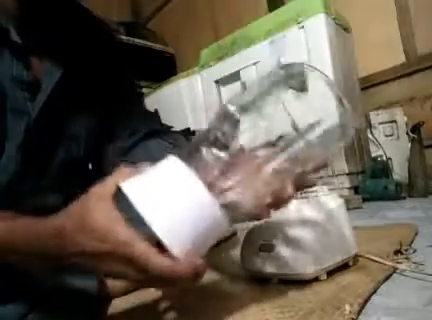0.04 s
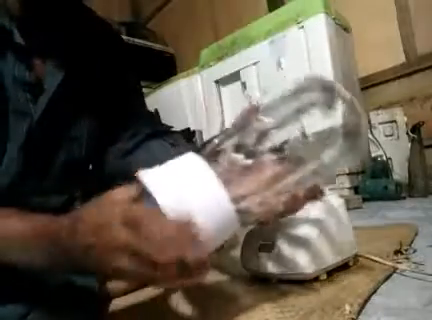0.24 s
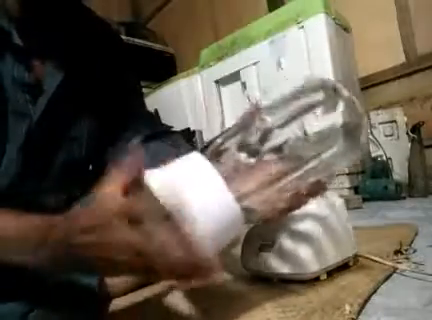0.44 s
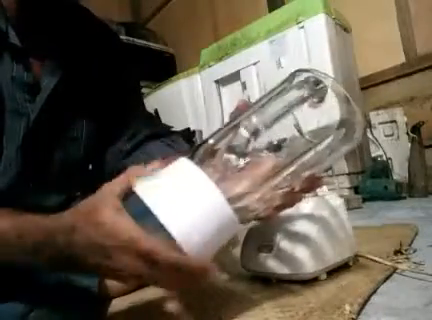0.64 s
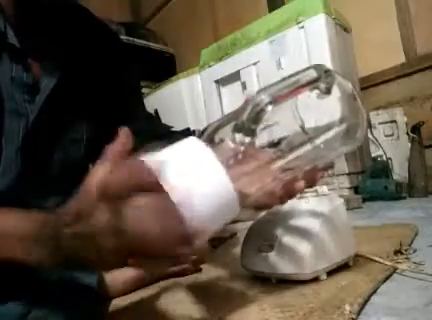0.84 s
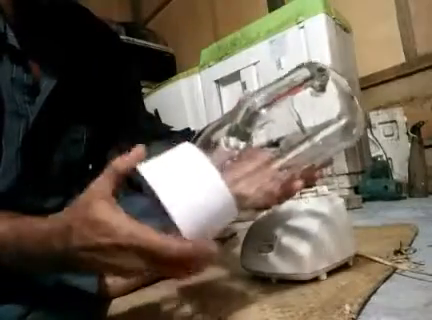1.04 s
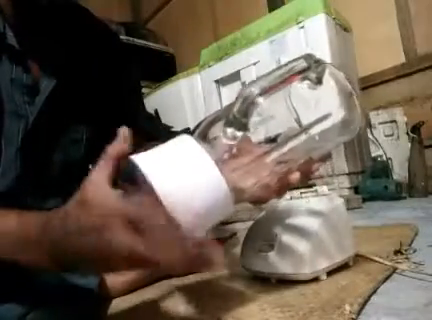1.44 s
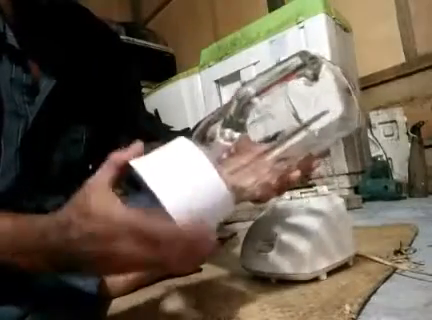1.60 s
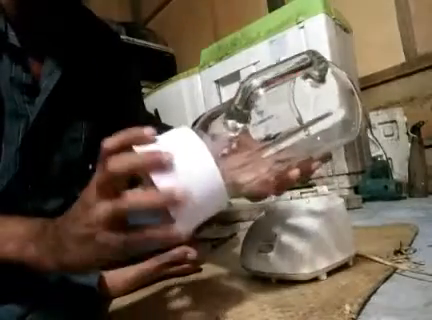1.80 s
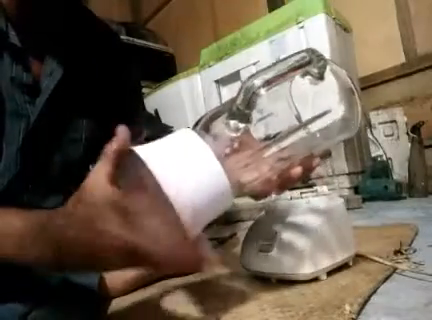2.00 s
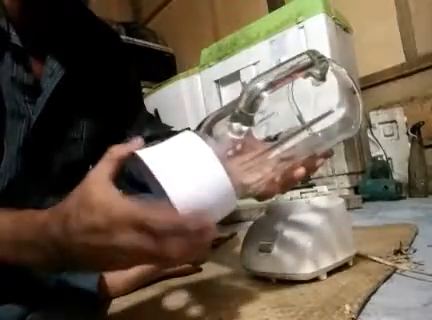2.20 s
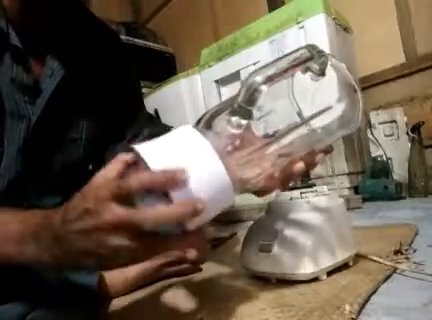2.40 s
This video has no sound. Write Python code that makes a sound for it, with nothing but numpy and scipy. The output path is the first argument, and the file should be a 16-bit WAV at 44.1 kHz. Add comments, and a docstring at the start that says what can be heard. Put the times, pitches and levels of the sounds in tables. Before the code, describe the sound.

Plastic base screwed onto an empty blender jar, with hollow knocks, sharp clicks and scrapes.

```python
"""Screwing the base onto a blender jar.

One hand holds the empty jar close to the microphone; the other twists its plastic base on in short
turns. Each new grip knocks the hollow jar, and the threads catch and snap with bright clicks. In
between, plastic and palm scrape and fingertips squeak. A small cluttered room echoes briefly."""
import sys
import numpy as np
from scipy import signal
from scipy.fft import rfft, irfft
from scipy.io import wavfile

SR = 44100
rng = np.random.default_rng(int(sys.argv[2]) if len(sys.argv) > 2 else 0)


def digitize_waveform(pressure):
    """Quantize a signal to 16-bit integers and store it at the path in sys.argv[1].

    Rows of a 2-D input are taken as channels; values are limited to [-1, 1].
    """
    field = np.atleast_2d(pressure).T
    bounded = np.clip(field, -1, 1)
    quanta = np.round(bounded * 32767).astype(np.int16)
    wavfile.write(sys.argv[1], SR, quanta)


N = 112454
SOFT_RISE_S, HARD_RISE_S = 0.0011, 0.00061  # how fast a bump and a click build up


def gain(db):
    """Turn decibels into a number to multiply by."""
    return 10 ** (np.asarray(db) / 20)


def fade(t, t60):
    """Die away by 60 dB in t60 seconds, the 'fade time'."""
    return np.exp(-np.log(1000) * t / t60)


def rise(t, seconds):
    """Climb smoothly from 0 towards 1."""
    return 1 - np.exp(-t / seconds)


def unit_energy(x):
    """Give a short sound the energy of level 1 held for 5 ms."""
    return x * np.sqrt(.005 * SR / np.sum(x ** 2))


def unit_level(x):
    """Scale a noise to an average (rms) level of 1."""
    return x / np.std(x)


def add(out, at, x):
    """Mix x into out at a time in seconds."""
    i = max(int(at * SR), 0)
    out[i:i + len(x)] += x[:max(len(out) - i, 0)]


def lowpass(x, hz, order=2):
    """Dull the sound above hz."""
    return signal.sosfilt(signal.butter(order, min(hz, SR / 2 - 1000), fs=SR, output="sos"), x)


def wobble(t, hz):
    """A random wavering, mostly slower than hz."""
    return unit_level(lowpass(rng.standard_normal(len(t)), hz))


def colour(x, points):
    """Shape the tone of x along a curve of (frequency [Hz], level [dB]) points."""
    hz, db = np.array(points, float).T
    size = 2048
    grid = np.maximum(np.arange(size // 2 + 1) * SR / size, 1)
    curve = gain(np.interp(np.log(grid), np.log(hz), db))
    # build the filter so that nothing sounds before the hit (minimum phase)
    cepstrum = irfft(np.log(curve))
    cepstrum[1:size // 2] *= 2
    cepstrum[size // 2 + 1:] = 0
    return signal.fftconvolve(x, irfft(np.exp(rfft(cepstrum))))[:len(x)]


def vary(points):
    """Add random peaks and dips to a tone curve: every contact is at another spot."""
    hz, db = np.array(points, float).T
    grid = np.geomspace(hz[0], hz[-1], num=40)
    curve_db = np.interp(np.log(grid), np.log(hz), db)
    return np.column_stack([grid, curve_db + 3 * rng.standard_normal(len(grid))])


def ring(t, tones, scatter=0):
    """Fading tones; scatter varies their strength and sign, as the place of a hit does."""
    out = 0
    for hz, db, t60 in tones:
        strength = gain(db) * (1 - scatter + scatter * rng.standard_normal())
        out = out + strength * np.sin(2 * np.pi * hz * t) * fade(t, t60)
    return out


def burst(t, tone, t60):
    """Struck plastic: so many short tones that they blur into a puff of noise."""
    noise = rng.standard_normal(len(t)) * fade(t, t60) * rise(t, HARD_RISE_S)
    return unit_energy(colour(noise, tone))


# tone of the background noise (frequency [Hz], relative level [dB])
BACKGROUND_TONE = [(25, -11.5), (55, 7.5), (90, -18), (145, -3), (250, -19), (900, -19.5), (2000, -24.5),
                   (5000, -36.5), (6400, -29), (7200, -23.5), (8200, -34.5), (10500, -30.5), (14000, -33)]

def background():
    """A faint, steady rumble with a little hiss."""
    return gain(-69.5) * unit_level(colour(rng.standard_normal(N), BACKGROUND_TONE))


# bands of the echo (low edge [Hz], high edge [Hz], fade time [s], level against the direct sound [dB])
ECHO_BANDS = [(39.6, 400, 0.11, -9), (410, 1130, 0.21, -9), (685, 2040, 0.51, -16), (3230, 16600, 0.2, -11)]

def room_echo(x):
    """The room throws the sound back after 7 ms as a short blur; each band fades at its own rate."""
    t = np.arange(SR // 2) / SR
    echo = 0
    for low_hz, high_hz, t60, db in ECHO_BANDS:
        tail = rng.standard_normal(len(t)) * fade(t, t60) * (t > .007)
        band = signal.sosfilt(signal.butter(2, [low_hz, high_hz], "band", fs=SR, output="sos"), tail)
        echo = echo + gain(db) * band * np.sqrt(2 * (high_hz - low_hz) / SR / np.sum(band ** 2))
    return signal.fftconvolve(x, echo)[:N]


# fingertip skids (time [s], level [dB], starting pitch [Hz])
FINGER_SKIDS = [(0.975, -42, 1686), (1.117, -53.5, 1970), (1.134, -44.5, 1640), (1.161, -47.5, 1715),
                (1.179, -45.5, 2080), (1.323, -46.5, 1800)]

def finger_squeaks(t):
    """A fingertip skids on the smooth wall: a short rising chirp with a weaker tone above it."""
    out = np.zeros(N)
    swell = t * np.exp(-t / .0026)
    for at, db, hz in FINGER_SKIDS:
        pitch_hz = hz * (1 + 8 * t + .08 * wobble(t, hz=600))
        phase = 2 * np.pi * np.cumsum(pitch_hz) / SR
        chirp = np.sin(phase) + gain(-6.5) * np.sin(1.42 * phase)
        add(out, at, gain(db) * unit_energy(swell * chirp))
    return out


# tones of the gripped base (pitch [Hz], relative level [dB], fade time [s])
BASE_TONES = [(70, -10, 0.097), (164.9, -14.5, 0.039), (298.7, -5, 0.14)]
# the palm lands for a firm grip (time [s], level [dB], thump pitch [Hz])
PALM_LANDINGS = [(0.227, -41, 300), (0.349, -40, 175), (0.521, -39, 315), (0.679, -35, 303),
                 (0.815, -31, 300), (0.911, -31, 300), (1.601, -36, 297), (1.763, -30, 180.6),
                 (2.178, -35.5, 260)]

def palm_thuds(t):
    """The heel of the hand bumps the base; the more flesh lands, the lower the thump."""
    out = np.zeros(N)
    thump_fade_s = .035
    for at, db, hz in PALM_LANDINGS:
        thud = ring(t, [(hz, 0, thump_fade_s)] + BASE_TONES) * rise(t, SOFT_RISE_S)
        add(out, at, gain(db) * unit_energy(thud))
    return out


# tones of the air in the jar and of the base (pitch [Hz], relative level [dB], fade time [s])
HOLLOW_TONES = [(170, -26.5, 0.078), (313, -31.5, 0.57), (360, -10, 0.074), (467, 5, 0.094),
                (497.7, 18.5, 0.043), (558, 3.5, 0.034), (643, -15.5, .06)]

def hollow_note(t):
    """The air in the empty jar rings together with the base."""
    return ring(t, HOLLOW_TONES)


# tones of the hiss at the rubbing spot and the rasp in the wall (frequency [Hz], relative level [dB])
HISS_TONE = [(50, -49.5), (500, -16), (2500, 8), (4000, -1), (5200, -6), (7200, -0.5), (9000, 1.5),
             (11000, -4.5), (15000, -16)]
RASP_TONE = [(30, -37), (150, -16), (380, -4.5), (800, -4), (1500, -4), (2500, -4.5), (3500, -19.5),
             (5200, -26), (15000, -45.5)]
# rubbing strokes (time [s], length [s], hiss [dB], rasp [dB], hollow note [dB])
STROKES = [(0.216, 0.05, -45, -43.5, -70), (0.259, 0.021, -42.5, -39, -41), (0.333, 0.052, -50, -51, -42.5),
           (0.37, 0.022, -37, -37, -39.5), (0.47, 0.067, -61, -59, -59), (0.559, 0.037, -40, -40.5, -36.5),
           (0.693, 0.3, -49, -57.5, -53), (0.775, 0.081, -36.5, -33, -37), (.850, 0.14, -85, -48.5, -45),
           (.935, 0.045, -78, -53, -49), (1.174, 0.09, -45, -40, -37.5), (1.261, 0.11, -52.5, -49, -41.5),
           (1.550, 0.17, -74, -59.5, -44.5), (1.695, 0.15, -48.5, -45, -51),
           (1.780, 0.031, -37.5, -36.5, -32.5), (1.913, 0.19, -72, -70.5, -58.5),
           (2.195, 0.15, -53.5, -47.5, -45), (2.314, 0.02, -40, -53, -54), (2.42, 0.032, -57, -49.5, -45),
           (2.534, 0.035, -55, -50, -40.5)]

def scrapes(t):
    """Plastic and palm stick and slip in tiny grains that hiss, rasp and stir the air in the jar."""
    out = np.zeros(N)
    rise_s, fall_s = .014, .019
    grains_per_s, scatter_db, hard_rub_db = 2600, 3.2, -36
    hollow = hollow_note(t)
    for at, length, hiss_db, rasp_db, note_db in STROKES:
        pressure = np.clip(t / rise_s, 0, 1) * np.exp(-np.maximum(t - length + fall_s, 0) / fall_s)
        grit, weight = rng.standard_normal((2, len(t)))
        slips = (rng.random(len(t)) < grains_per_s / SR) * gain(scatter_db * weight)
        slip_energy = signal.fftconvolve(slips ** 2, fade(t, t60=.005) ** 2)[:len(t)]
        grains = grit * pressure * np.sqrt(np.abs(slip_energy))
        crunch_db = 4 * min(gain(rasp_db - hard_rub_db), 1)  # harder rubbing bunches the grains
        hiss = unit_level(colour(grains * gain(crunch_db * wobble(t, hz=110)), vary(HISS_TONE)))
        rasp = unit_level(colour(grains * gain(crunch_db * wobble(t, hz=110)), RASP_TONE))
        note = unit_level(signal.fftconvolve(grains, hollow)[:len(t)])
        stroke = gain(hiss_db) * hiss + gain(rasp_db) * rasp + gain(note_db) * note
        add(out, at, stroke * np.sqrt(np.mean(pressure ** 2)))
    return out


# ringing tones of the wall, and the tone of its clack (frequency [Hz], relative level [dB])
WALL_TONES = [(738, 2), (870, 2.5), (960, 1.5), (1045, 4.5), (1128, 3.5), (1205, 8.5), (1345, 5.5),
              (1570, 8), (2037, -8.5), (2315, -8), (2520, -8)]
CLACK_TONE = [(25, -55.5), (60, -17), (100, -20.5), (150, 0.5), (380, 1), (800, 6.5), (1400, 5.5),
              (2000, -5.5), (3000, -13), (5000, -22), (15000, -27.5)]
# hand and base hit the jar
# (time [s], relative note level [dB], relative clack level [dB], starting pitch [times normal])
JAR_HITS = [(.224, -29.5, -52, 1), (0.233, -20.5, -22.5, 1.033), (0.356, -33, -43.5, 1.26),
            (.430, -40.5, -50, 0.83), (0.526, -19.5, -27, 0.98), (0.578, -26.5, -33, 0.99),
            (0.686, -19.5, -22, 0.94), (.783, -17, -28, 1.027), (.790, -15, -51, 1),
            (.830, -21.5, -52, 0.96), (0.9212, -16.5, -19, 1.07), (1.123, -42, -50.5, 0.99),
            (1.193, -37, -35, 0.6), (1.211, -31.5, -33, 1.01), (1.222, -31, -38.5, 1.3),
            (1.379, -25, -26, 1), (1.565, -28, -41, 0.88), (1.576, -29.5, -30.5, 1.15),
            (1.604, -21, -21, 1.06), (1.647, -38, -38.5, 1.18), (1.680, -43, -53, 1.2),
            (1.729, -36, -67.5, 1.2), (1.770, -19.5, -24, 0.98), (1.905, -37.5, -78.5, 0.92),
            (1.981, -42.5, -58, 0.91), (2.016, -36.5, -49, 1.1), (2.033, -29, -35, 1.04),
            (2.164, -38, -58.5, 1), (2.185, -27.5, -23, 0.94), (2.267, -25, -32, 1.036),
            (2.301, -31, -64, 0.99), (2.322, -33, -50, 1.084), (2.444, -36, -43.5, 0.9),
            (2.545, -37.5, -43.5, 0.62)]

def jar_knocks(t):
    """Each hit clacks the wall and sounds the hollow note, which settles from a pitch set by the grip."""
    out = np.zeros(N)
    settle_s, wall_fade_s, lead_s = .07, .07, .00832
    wall_tones = [(hz, db, wall_fade_s) for hz, db in WALL_TONES]
    contact = rise(t, SOFT_RISE_S)
    for at, note_db, clack_db, pitch in JAR_HITS:
        bent_time = t + (pitch - 1) * settle_s * rise(t, settle_s)
        note = unit_energy(hollow_note(bent_time) * contact)
        add(out, at - lead_s, gain(note_db - 12) * note)  # soft flesh lands just before the hard hit
        add(out, at, gain(note_db - 1.5) * note)
        clack = burst(t, CLACK_TONE, t60=.057)
        ringing = gain(1) * unit_energy(ring(t, wall_tones, scatter=.35))
        top_hz = 22000 * 2 ** (clack_db / 12)  # a lighter touch sounds duller
        wall = lowpass((clack + ringing) * contact, top_hz)
        add(out, at, gain(clack_db - 3.5) * unit_energy(wall))
    return out


def stutter(slip):
    """A slip is followed within 8 ms by three weaker ones."""
    out = slip.copy()
    for delay, size in rng.random(size=(3, 2)):
        add(out, delay * .008, .6 * size * rng.choice([-1, 1]) * slip)
    return unit_energy(out)


# tones of the bright snap and of the crack through the wall (frequency [Hz], relative level [dB])
SNAP_TONE = [(500, -46), (3500, -12.5), (5000, -8), (5900, -2.5), (6700, -6), (7400, -0.5), (8700, 1.5),
             (10500, -2), (12500, -6.5), (15000, -14)]
CRACK_TONE = [(30, -49), (100, -30.5), (700, -5), (1500, 2), (2500, 4.5), (3500, -13), (4200, -11),
              (5200, -21.5), (15000, -33.5)]
# the threads let go (time [s], relative snap level [dB], rim pitch [Hz], relative crack level [dB])
THREAD_SLIPS = [(0.2337, -20, 8900, -23.5), (0.2385, -30, 7060, -23.5), (0.3636, -27, 8470, -27),
                (0.365, -30, 6100, -26), (0.528, -39, 8100, -38.5), (.581, -36, 7900, -25),
                (0.6866, -29.5, 9300, -28.5), (0.725, -36, 7900, -35), (0.7905, -14.5, 6030, -13.5),
                (0.7917, -20.5, 7580, -26), (0.8161, -29, 10500, -15.5), (0.8642, -26.5, 8030, -21.5),
                (0.868, -36, 6200, -33), (0.8998, -24.5, 5720, -24), (0.912, -25.5, 6140, -25),
                (0.9207, -32.5, 7400, -19.5), (1.060, -54.5, 6860, -47.5), (1.118, -46.5, 7930, -62),
                (1.202, -22.5, 6900, -15), (1.2356, -32.5, 3070, -42), (1.2488, -34.5, 8200, -63),
                (1.34, -51, 8100, -52), (1.3814, -38.5, 7130, -24), (1.606, -34.5, 8700, -54.5),
                (1.654, -43, 9500, -33.5), (1.701, -38, 8400, -38.5), (1.7283, -40.5, 3430, -33),
                (1.7284, -40.5, 9300, -37), (1.742, -45, 9500, -38), (1.77, -31, 7940, -55),
                (1.7834, -28.5, 7060, -24.5), (2.086, -70, 7800, -37), (2.184, -41, 7840, -39),
                (2.191, -33, 7080, -25), (2.202, -46, 7300, -35.5), (2.2384, -34, 9400, -34.5),
                (2.264, -43, 8500, -29), (2.2855, -27.5, 7240, -36), (2.302, -43, 8500, -28),
                (2.327, -40.5, 8150, -32.5)]

def thread_clicks(t):
    """A thread slips: a hard tick, a bright snap, a brief ring of the rim and a crack through the wall."""
    out = np.zeros(N)
    rim_spread, rim_fade_s = .028, .008
    for at, snap_db, hz, crack_db in THREAD_SLIPS:
        rim_tones = [(hz * (1 + rim_spread * r), 0, rim_fade_s) for r in rng.standard_normal(4)]
        rim = ring(t, rim_tones, scatter=.84) * rise(t, HARD_RISE_S)
        tick = gain(-11) * burst(t, SNAP_TONE, t60=.006)
        snap = burst(t, vary(SNAP_TONE), t60=.018)
        click = unit_energy(lowpass(tick + snap, 1.314 * hz, order=4)) + gain(-2.5) * unit_energy(rim)
        crack = stutter(burst(t, vary(CRACK_TONE), t60=.022))
        add(out, at, gain(snap_db - 4.5) * unit_energy(click) + gain(crack_db - 9.5) * crack)
    return out


# gaps in the sound of the jar (frequency [Hz], width [Hz])
JAR_GAPS = [(382, 81), (665, 71)]

def jar_body(x):
    """The jar barely responds in a narrow band on each side of its hollow note."""
    for hz, width_hz in JAR_GAPS:
        x = signal.lfilter(*signal.iirnotch(hz, hz / width_hz, fs=SR), x)
    return x


# how much echo and background differ between left and right (frequency [Hz], level [dB])
STEREO_SPREAD = [(60, -20), (450, -39), (2600, -28), (4400, -7), (8000, -1), (14000, 2)]

def scene():
    """The jar straight ahead, over a faint background; mainly the room's treble spreads to the sides."""
    t = np.arange(SR // 3) / SR  # the clock of one short sound
    jar = jar_body(palm_thuds(t) + jar_knocks(t) + thread_clicks(t) + finger_squeaks(t) + scrapes(t))
    middle_noise, side_noise = background(), gain(-7.5) * background()
    middle = jar + room_echo(jar) + middle_noise
    side = colour(room_echo(jar) + side_noise, STEREO_SPREAD)
    return np.array([middle + side, middle - side])


def record(dry):
    """The microphone thins the deep bass and cuts the highest treble."""
    bass_hz, top_hz = 161, 14400
    thin = signal.sosfilt(signal.butter(1, bass_hz, "high", fs=SR, output="sos"), dry)
    return signal.sosfilt(signal.ellip(8, .2, 70, top_hz, fs=SR, output="sos"), thin)


dry = scene()
out = record(dry)
digitize_waveform(out)
```